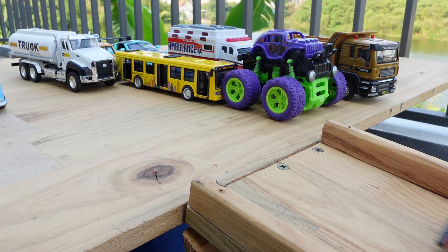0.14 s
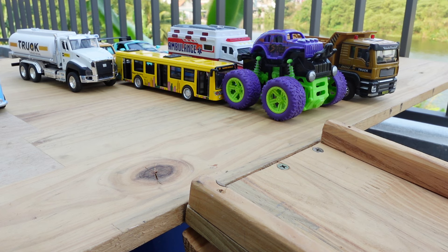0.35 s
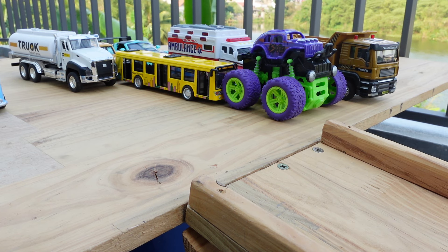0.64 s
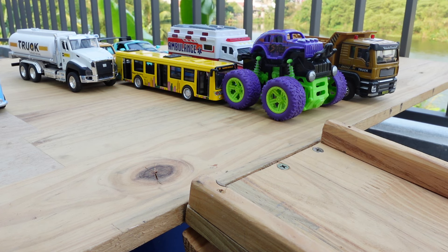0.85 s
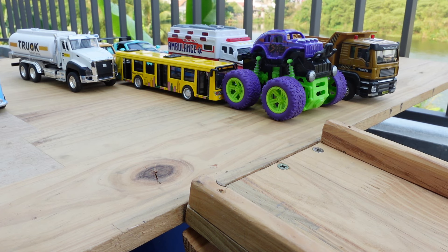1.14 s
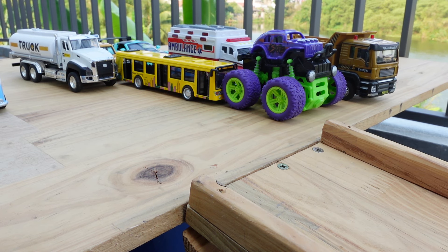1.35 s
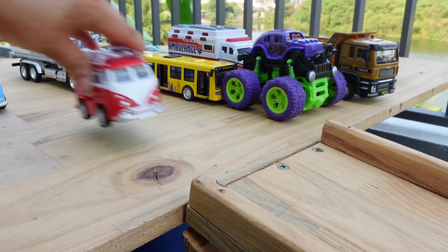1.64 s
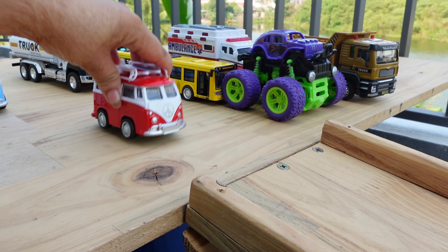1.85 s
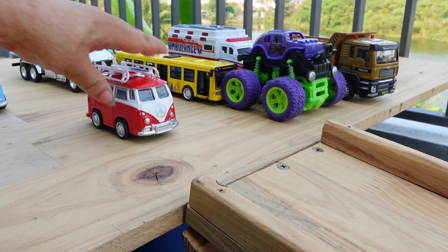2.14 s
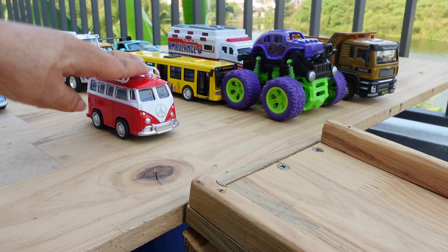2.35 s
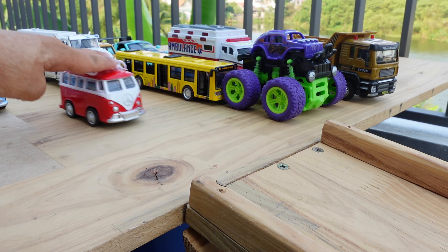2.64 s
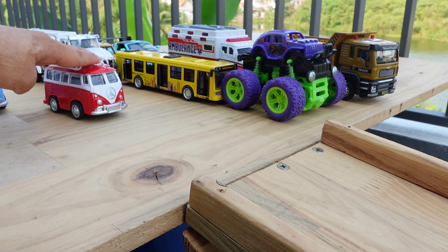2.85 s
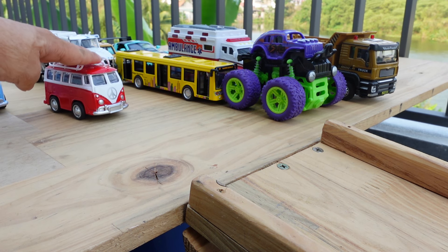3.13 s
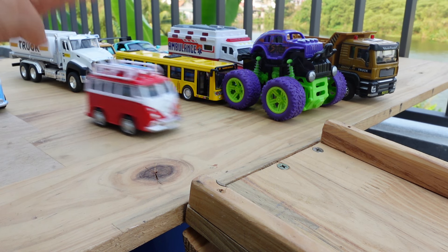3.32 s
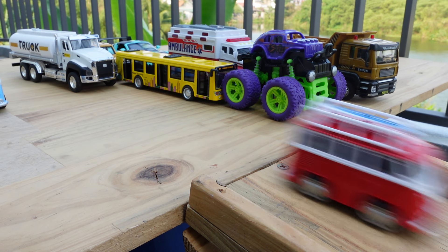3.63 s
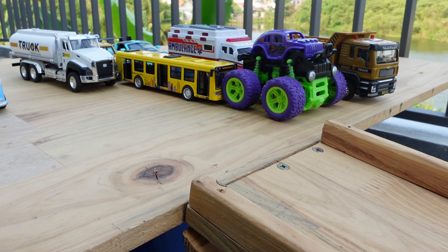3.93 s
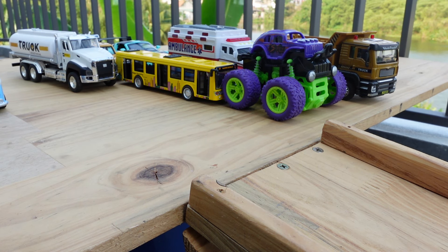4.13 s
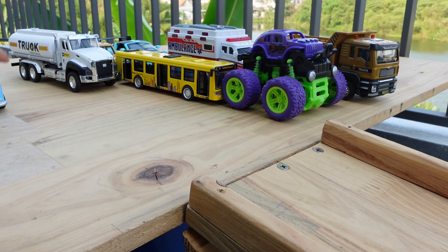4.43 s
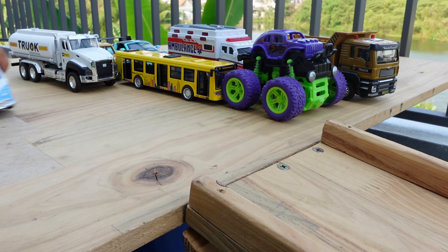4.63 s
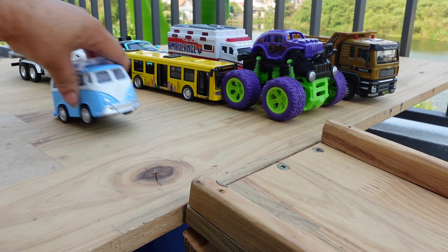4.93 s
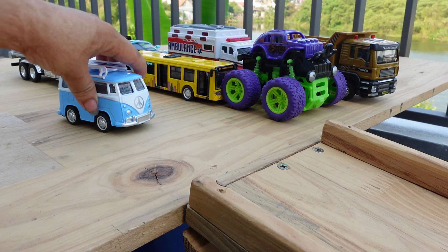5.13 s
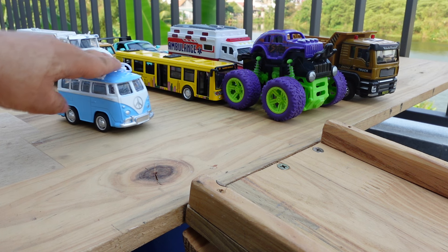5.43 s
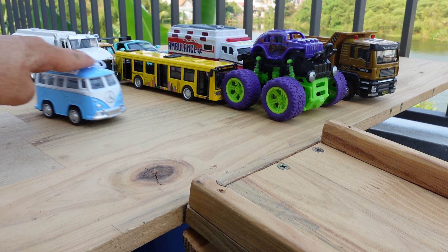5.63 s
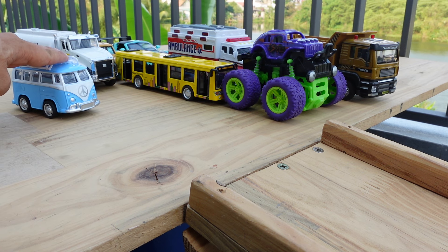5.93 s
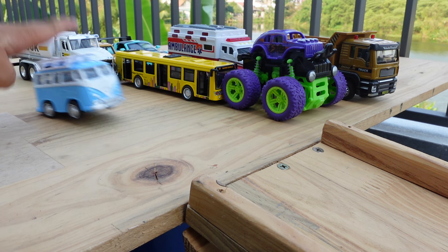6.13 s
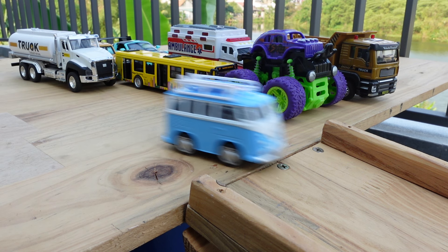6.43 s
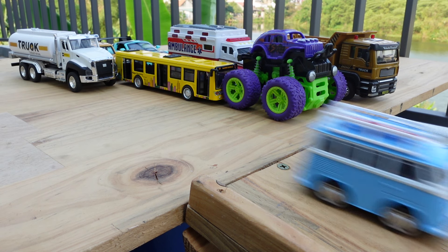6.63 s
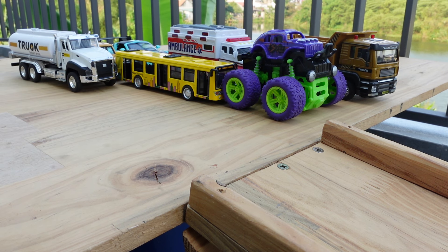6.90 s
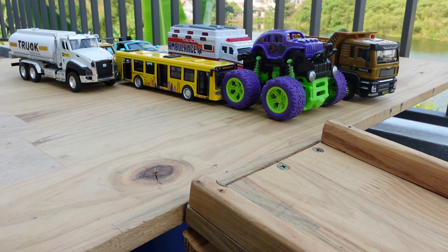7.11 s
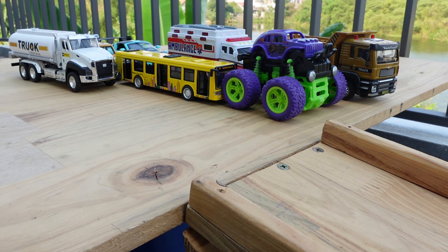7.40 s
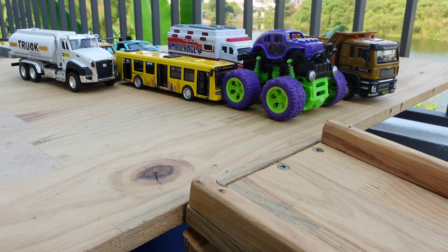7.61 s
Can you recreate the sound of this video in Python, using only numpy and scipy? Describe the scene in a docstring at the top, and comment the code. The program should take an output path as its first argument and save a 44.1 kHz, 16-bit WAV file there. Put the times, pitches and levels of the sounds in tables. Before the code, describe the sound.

Outdoors at a wooden table, a toy truck rumbles away with dull wooden knocks under low wind buffeting. A toy van is set down with a sharp clack, its gears tick as it is pulled back, then it clatters away down a board. After a quieter pause a second van does the same. Close microphone, almost dry, much louder on the left, with a faint distant wash and hum.

```python
"""At a wooden table outdoors, small pull-back toy cars are set down, drawn back to wind their springs and let go.
They rattle over the top and down a plank ramp, knocking as they go. Every contact is a burst of noise and
fading rings of shell, hard parts, board and table. Shaped noise makes wind on the microphone and a distant
wash, with a faint hum; a thin whine comes once. The left channel is much louder than the right."""
import sys
import numpy as np
from scipy import signal
from scipy.fft import rfft, irfft
from scipy.io import wavfile
from scipy.ndimage import uniform_filter1d, minimum_filter1d

SR = 44100
rng = np.random.default_rng(int(sys.argv[2]) if len(sys.argv) > 2 else 0)


def put_to_file(sound):
    """Save the sound as 16-bit audio at rate SR, in the file named by the first command-line argument."""
    columns = np.atleast_2d(sound).T  # one column per channel
    safe = np.clip(columns, -1, 1)
    whole_steps = np.round(safe * 32767)
    wavfile.write(sys.argv[1], SR, whole_steps.astype(np.int16))


N = 342216
TIME = np.arange(N) / SR  # seconds
RING = np.arange(SR // 14) / SR  # seconds within one ring

# Modes are the pitches at which a thing rings by itself.
# Each row of these four: pitch in Hz, relative level in dB, time to fade by 60 dB in seconds.
# A car's shell and chassis.
SHELL_MODES = [(1235, 2, 0.017), (1462, 0, 0.024), (1580, -5, 0.026), (1864, -4.5, 0.016),
               (1945, -5.5, 0.021), (2190, -3, 0.03), (2590, -9.5, 0.058), (2783, 2, 0.018),
               (3150, -16, 0.033), (3640, -6.5, 0.029), (3936, 0, 0.024), (4540, -8.5, 0.032),
               (4980, -16, 0.034), (5230, -34, 0.0083)]
# The small hard parts, axles and gears.
EDGE_MODES = [(5570, 17, 0.038), (6420, 12.5, 0.023), (6880, 14.5, 0.025), (7240, -6, 0.014),
              (8800, -11, 0.044), (9370, -54.5, 0.004), (11500, -60.5, 0.0053), (13300, -12, .01),
              (15000, 1, 0.0093)]
# The ramp board.
BOARD_MODES = [(495, -7.5, 0.024), (577, -1.5, 0.037), (690, -3, 0.028), (813, 1.5, 0.019),
               (910, -4, 0.017), (1043, -1.5, 0.021)]
# The table top.
TABLE_MODES = [(130, -0.5, 0.089), (219, -11.5, 0.034), (256.4, 1.5, 0.11), (312, -3, 0.034),
               (383, -4, 0.073), (469, -8, 0.049)]


def amp(db):
    """Turns decibels into a gain."""
    return 10 ** (np.asarray(db) / 20)


def unit(x):
    """Scales a sound to an rms (average strength) of 1."""
    return x / np.sqrt(np.mean(x ** 2) + 1e-20)


def blow(x):
    """Scales a ring to rms 1 over its first 10 ms."""
    return x / np.sqrt(np.mean(x[:SR // 100] ** 2))


def add(mix, s, sound):
    """Mixes a sound in at s seconds."""
    part = mix[max(round(s * SR), 0):][:len(sound)]
    part += sound[:len(part)]


def noise(points):
    """Complex noise with the given spectrum: its real part is the sound, its size the envelope."""
    hz, db = np.transpose(points)
    bins = np.fft.rfftfreq(N, 1 / SR)
    shape = amp(np.interp(np.log(bins + 1), np.log(hz), db))
    shaped = irfft(rfft(rng.standard_normal(N)) * shape, N)
    return signal.hilbert(unit(shaped))


def drift(rate):
    """A random curve of rms 1 that takes a new direction rate times a second."""
    points = rng.standard_normal(N // 20)
    return unit(np.interp(TIME * rate, np.arange(N // 20), points))


def strike(modes, vary_db, scatter):
    """One blow makes all the modes ring and fade; where it lands changes their strengths each time."""
    hz, db, t60 = np.transpose(modes)
    weight, detune, start = rng.standard_normal((3, len(hz)))
    hz = hz * (1 + scatter * detune)
    fade = amp((db + vary_db * weight)[:, None] - 60 * RING / t60[:, None])
    rings = fade * np.sin(2 * np.pi * hz[:, None] * RING)
    # the vibration takes a moment to fill the body
    ring = np.sign(start) @ rings * (1 - np.exp(-RING / 0.00057))
    return blow(ring)


def crack(lo_hz, hi_hz, decay):
    """The crowded vibration at the moment of contact: band-limited noise dying over decay seconds."""
    burst = rng.standard_normal(len(RING)) * np.exp(-RING / decay) * (1 - np.exp(-RING / 0.0004))
    band = signal.butter(2, [lo_hz, min(hi_hz, SR * 0.45)], "band", fs=SR, output="sos")
    return blow(signal.sosfilt(band, burst))


def contact(centre_hz, range_octaves, shell_share, t60=0.021):
    """One small contact as four parts, shell, hard edge, board and table, with a ring pitch of its own."""
    hz = np.clip(centre_hz * 2 ** (range_octaves * rng.standard_normal()), 1200, 6500)
    own = strike([(hz, 0, t60)], vary_db=0, scatter=0)
    own += 0.55 * crack(lo_hz=hz / 1.62, hi_hz=hz * 1.34, decay=0.0026)
    shell = own + shell_share * strike(SHELL_MODES, vary_db=10.5, scatter=0.0079)
    edge = strike(EDGE_MODES, vary_db=5, scatter=0.03)
    edge += 0.93 * crack(lo_hz=4700, hi_hz=9260, decay=0.0016)
    board = strike(BOARD_MODES, vary_db=3.0, scatter=0.019)
    table = strike(TABLE_MODES, vary_db=7.0, scatter=0.071)
    return np.array([shell, edge, board, table])


def wood_at(s):
    """Board and table answer differently on the table top, on the ramp and at its foot: dB at time s."""
    # The way down of the truck, the red van and the blue van.
    # Each row: tips onto the ramp, reaches its foot, comes to rest, all in seconds.
    descents = [(-0.3, -0.053, 1.22), (3.546, 3.852, 4.24), (6.47, 6.828, 7.16)]
    # How the wood answers a contact on the table top, on the ramp and at its foot.
    # Each row: board level in dB, table thump in dB, both relative.
    wood_levels = [(-15.5, -10), (-18.5, -20), (-5.5, -15)]
    place = sum((s >= ramp) * (s < rest) * (1 + (s >= foot)) for ramp, foot, rest in descents)
    return np.array(wood_levels)[place].T


def motion(curve):
    """Gain over time of one movement, given as (seconds, dB) points, with soft ends."""
    s, db = np.transpose(curve)
    ends = np.clip(np.minimum(TIME - s[0], s[-1] - TIME) / 0.02, 0, 1)
    return ends * amp(np.interp(TIME, s, db))


def rattle(moves, per_s, spread_db, clump_db, parts_db, centre_hz, range_octaves, shell_share, count=60):
    """Many small clumped contacts, each at one of count places; parts_db weights the four parts."""
    # Harder running is brighter and rings the wood less.
    # In order: change in dB per dB of rattle for shell, hard edge, board, table.
    force_tilt = (0, 0.25, -0.34, -0.48)
    size_db = spread_db * np.minimum(rng.exponential(1, N), 2.5)
    size = amp(size_db + clump_db * drift(rate=90))
    clicks = size * (rng.random(N) < per_s / SR) * rng.choice([-1, 1], N)
    # each place shares its energy differently among shell, edge, board and table
    places = []
    for _ in range(count):
        share = amp(2.1 * rng.standard_normal((4, 1)))
        places.append(contact(centre_hz, range_octaves, shell_share) * share)
    place = rng.integers(0, count, N)
    out = np.zeros(N)
    for move in moves:
        s, db = np.transpose(move)
        span = slice(max(int((s[0] - 0.01) * SR), 0), min(int((s[-1] + 0.015) * SR), N))
        t, level = TIME[span], motion(move)[span]
        force = np.interp(t, s, db - db.mean())
        parts = np.zeros((4, len(t) + len(RING)))
        for at in np.flatnonzero(clicks[span]):
            parts[:, at:at + len(RING)] += clicks[span][at] * places[place[span][at]]
        answers = [0, 0, *wood_at(t)]
        for sound, wood_db, part_db, tilt in zip(parts[:, :len(t)], answers, parts_db, force_tilt):
            # the motion sets the mean power; single contacts stay uneven
            power = abs(uniform_filter1d(sound ** 2, size=2200))
            even = sound / np.sqrt(power + 1e-6)
            out[span] += even * level * amp(wood_db + part_db + tilt * force)
    return out


def rolling():
    """Cars run free and the wood rumbles; the heavier truck has a denser, duller roll than the two vans."""
    # How hard each free-running car rattles. Each row: time in seconds, relative level in dB.
    truck_run = [(0.0, -35.5), (0.14, -50), (0.23, -39.5), (0.36, -36), (0.5, -41.5), (0.78, -35.5),
                 (0.84, -29.5), (0.96, -32), (1.04, -41.5), (1.19, -43)]
    # The red van. Each row: time in seconds, relative level in dB.
    red_run = [(3.315, -15.5), (3.39, -26), (3.46, -35), (3.6, -25.5), (3.7, -30), (3.81, -35),
               (3.88, -23.5), (4.05, -40), (4.22, -48)]
    # The blue van. Each row: time in seconds, relative level in dB.
    blue_run = [(6.219, -19.5), (6.41, -30), (6.51, -25), (6.61, -31), (6.72, -22.5), (6.79, -35),
                (6.86, -21.5), (6.94, -26), (7.02, -38.5), (7.14, -42)]
    # Rumble of the wood under rolling wheels. Each row: pitch in Hz, relative level in dB per Hz.
    rumble_spectrum = [(18, -22), (40, -9.5), (85, 4), (125, -4.5), (180, -11), (260, -16), (500, -29),
                       (2000, -60)]
    rumble_db = -9  # against the rattle
    truck_weight_db = 14.5  # the truck rumbles this much more, against its rattle, than a van
    truck = rattle([truck_run], per_s=1500, spread_db=3, clump_db=5.0, parts_db=(0, -16, 5.5, 10),
                   centre_hz=1803, range_octaves=0.48, shell_share=0.2)
    red = rattle([red_run], per_s=420, spread_db=4.5, clump_db=3.5, parts_db=(-1.5, -17, 1.5, 5.5),
                 centre_hz=2500, range_octaves=0.564, shell_share=0.84, count=40)
    blue = rattle([blue_run], per_s=450, spread_db=4, clump_db=3.0, parts_db=(-1, -17, -3.5, -2.5),
                  centre_hz=2746, range_octaves=0.528, shell_share=1.0, count=40)
    weight = amp(truck_weight_db) * motion(truck_run) + motion(red_run) + motion(blue_run)
    rumble = amp(rumble_db) * weight * noise(rumble_spectrum).real
    return truck + red + blue + rumble


def wind(steadiness, lull_db):
    """Eddies shed at the microphone: deep, fairly even buffeting and a lighter, fitful flutter."""
    # Strength of the wind on the microphone. Each row: time in seconds, relative level in dB.
    breeze = [(0.0, -17), (0.12, -9.5), (1.2, -12.5), (1.54, -25.5), (1.85, -18.5), (2.14, -25),
              (2.21, -15), (2.8, -26), (2.93, -13), (3.22, -12.5), (3.78, -32.5), (4.1, -31.5), (4.4, -51),
              (5.8, -47.5), (6.33, -31.5), (6.6, -48), (7.05, -38.5), (7.35, -57), (7.7, -38.5)]
    # Spectrum of the buffeting. Each row: pitch in Hz, relative level in dB per Hz.
    buffet_spectrum = [(8, -11), (18, -6), (30, -2), (48, -1.5), (70, -6.5), (100, -33), (200, -68),
                       (500, -85.5)]
    # Spectrum of the flutter. Each row: pitch in Hz, relative level in dB per Hz.
    flutter_spectrum = [(40, -9), (80, 5), (120, -3), (170, -8.5), (250, -18.5), (400, -25.5), (800, -32.5),
                        (2000, -43.5), (8000, -56.5)]
    flutter_db, flutter_slope = -15, 0.66  # the flutter follows the wind by this many dB per dB
    strength = np.interp(TIME, *np.transpose(breeze))
    raw = noise(buffet_spectrum)
    # dividing by part of the envelope evens out the buffeting
    steady = unit(raw.real / (abs(raw) ** 2 + 0.6) ** (steadiness / 2))
    eddies = steady * amp(strength + 1.2 * drift(rate=9))
    flutter_level = flutter_db + flutter_slope * strength + lull_db * drift(rate=14)
    ripples = noise(flutter_spectrum).real * amp(flutter_level)
    # each has its own left and right gains in dB
    return eddies * amp([[4.8], [-11.8]]) + ripples * amp([[5], [-14]])


def outdoors():
    """A distant wash of shaped noise with the wavering hum of some far machine, a sine of drifting pitch."""
    # Spectrum of the wash. Each row: pitch in Hz, relative level in dB per Hz.
    wash_spectrum = [(24, -49), (40, -24), (104, -11), (118, -1), (140, -11), (204, -12.5), (354, -15),
                     (392, -18), (455, -18), (503, -17), (715, -22.5), (790, -20.5), (918, -27),
                     (4930, -38), (16000, -53.5)]
    wash_db, hum_db = -39, -46  # before the channel gains
    hum_hz = 139.3  # middle of its wavering pitch
    turns = np.cumsum(hum_hz * (1 + 0.01977 * drift(rate=9))) / SR
    hum = unit(np.sin(2 * np.pi * turns) * amp(3 * drift(rate=8)))
    wash = noise(wash_spectrum).real * amp(1.04 * drift(rate=4.5))
    return amp(wash_db) * wash + amp(hum_db) * hum


def knock(hz, edge, board, thump):
    """A wheel or body hits the wood: shell cracks and rings, board and table answer, one mode stands out."""
    shell_db = 0.38
    shell = amp(-8) * strike(SHELL_MODES, vary_db=5.5, scatter=0.0063)
    shell += amp(-6.0) * crack(lo_hz=1460, hi_hz=4720, decay=0.0048)
    main = amp(-5) * strike([(hz, 0, 0.022)], vary_db=0, scatter=0)
    main += amp(-4.5) * crack(lo_hz=hz / 1.255, hi_hz=hz * 1.195, decay=0.0033)
    tick = amp(-7) * strike(EDGE_MODES, vary_db=5, scatter=0.012)
    tick += amp(-3) * crack(lo_hz=4670, hi_hz=9700, decay=0.0024)
    # the very first instant of a hard contact is the brightest
    tick += amp(-14.5) * crack(lo_hz=11500, hi_hz=16600, decay=0.0017)
    plank = strike(BOARD_MODES, vary_db=2.5, scatter=0.0083)
    if hz > EDGE_MODES[1][0]:
        tick += main  # so high a mode belongs to the small hard parts
    elif hz < BOARD_MODES[-1][0]:
        # so low a mode belongs to the board: a flat landing drives it and spares the shell
        plank = blow(plank + 2 * main)
        shell_db, board = -10.5, 0.5
    else:
        shell += main
    table = strike(TABLE_MODES, vary_db=3.5, scatter=0.03)
    return amp(shell_db) * blow(shell) + amp(edge) * tick + amp(board) * plank + amp(thump) * table


def knocks(graze_db=-19, graze_s=0.0027):
    """Each knock is a graze of one wheel, the weight landing, and a weaker rebound onto the other axle."""
    # The knocks that stand out. Each row: start in seconds, relative level in dB,
    # pitch that stands out in Hz, relative level of the hard edge in dB.
    knock_list = [(0.3712, -40, 1780, -30), (0.423, -39, 2040, -29), (0.476, -36, 1920, -30),
                  (0.554, -41, 1880, -6.5), (0.6806, -23.5, 2140, -30), (0.7069, -28, 600, -30),
                  (0.7644, -31, 1660, -3), (0.819, -27.5, 2800, -1.5), (0.833, -27, 1610, -25),
                  (0.8996, -28, 830, -5.5), (0.948, -33.5, 2400, -2), (1.0733, -34.5, 3060, -6),
                  (1.0932, -29.5, 1790, -34), (1.1002, -24, 870, -32), (1.3112, -30, 4355, -5.5),
                  (1.3743, -28.5, 2960, -14), (1.9196, -16.5, 2385, -6.5), (1.9273, -23, 1370, -16),
                  (1.945, -24, 3480, -33), (1.9786, -28, 3550, -31), (2.7536, -26.5, 5300, -4.5),
                  (2.8182, -40, 2500, -28), (2.92, -34, 4740, -0.5), (3.27, -27.5, 3880, -3.5),
                  (3.3167, -15.5, 4040, -7.5), (3.3577, -21.5, 4020, -16), (3.4129, -21, 3710, -26),
                  (3.4966, -21, 2640, -16), (3.571, -14.5, 5260, -20), (3.602, -23.5, 2190, -20),
                  (3.665, -20.5, 1310, -21), (3.689, -19.5, 1870, -25), (3.7172, -17.5, 1950, -26),
                  (3.7336, -25, 1820, -28), (3.8458, -23, 2690, -32), (3.859, -20, 564, -32),
                  (3.868, -19.5, 3680, -30), (3.8856, -22, 2240, -31), (3.9154, -26.5, 1340, -30),
                  (3.99, -17, 2545, -4.5), (4.006, -23, 1720, -14), (4.0354, -26.5, 2260, -29),
                  (4.089, -36.5, 8600, 3), (4.1095, -19.5, 1360, -28), (4.1233, -28.5, 2200, -29),
                  (4.171, -31, 810, -25), (4.177, -20.5, 2060, -13), (4.3241, -39, 6300, -16),
                  (4.346, -37.5, 1240, -19), (4.55, -36, 1430, -30), (4.6701, -36, 1360, -34),
                  (4.7159, -37.5, 2860, -24), (4.9503, -34, 1340, -33), (4.9683, -31.5, 2900, -30),
                  (5.1166, -20.5, 2680, -9), (5.2492, -33, 1390, -30), (5.4827, -54, 4520, 6.5),
                  (5.887, -38.5, 3500, -14), (5.9133, -38, 2370, -8), (6.0436, -33.5, 2850, -9),
                  (6.117, -25.5, 5040, -5.5), (6.225, -17.5, 5000, -8.5), (6.265, -17, 2390, -3.5),
                  (6.2831, -22, 5070, -18), (6.3049, -19, 3690, -11), (6.3201, -20, 3760, -10),
                  (6.3376, -18.5, 3450, -10), (6.3667, -23.5, 2950, -24), (6.3846, -22.5, 2980, -29),
                  (6.443, -21.5, 3790, -10), (6.555, -18.5, 1860, -12), (6.6565, -18, 1660, -9.5),
                  (6.724, -24.5, 4150, -11), (6.831, -23.5, 2750, -28), (6.8409, -27, 810, -25),
                  (6.8613, -24.5, 2300, -12), (6.9729, -17.5, 3740, -2.5), (6.9901, -20, 2060, -27),
                  (7.0525, -18.5, 1491, -12), (7.0723, -22, 1360, -14), (7.0954, -27.5, 1440, -25),
                  (7.109, -25.5, 2320, -10.5), (7.6588, -30.5, 2000, -37)]
    # the rebound's usual delay in seconds, its level and the random spread of that level in dB
    rebound_s, rebound_db, rebound_spread_db = 0.0072, -13.5, 4
    # a light touch loses less thump than ring: dB regained per dB under a firm knock
    firm_db, soft_thump = -14.5, 0.24
    out = np.zeros(N)
    for s, db, hz, edge in knock_list:
        board, thump = wood_at(s)
        thump += soft_thump * (firm_db - db)
        early, late, strength = rng.standard_normal(3)
        light = knock(hz, edge, board, thump)
        add(out, s - graze_s * np.exp(0.3 * early), amp(db + graze_db) * light)
        add(out, s, amp(db) * knock(hz, edge, board, thump))
        back_db = db + rebound_db + rebound_spread_db * strength
        add(out, s + rebound_s * np.exp(0.15 * late), amp(back_db) * light)
    return out


def thuds():
    """The table top booms briefly under a soft weight, ringing in its own modes."""
    # Soft, heavy touches that only sound the table top. Each row: start in seconds, relative level in dB.
    thud_list = [(0.476, -26), (3.3667, -26), (4.09, -23), (4.968, -30.5), (5.117, -28), (5.8868, -29),
                 (6.0436, -30.5), (7.0722, -29)]
    out = np.zeros(N)
    for s, db in thud_list:
        add(out, s, amp(db) * strike(TABLE_MODES, vary_db=2, scatter=0.027))
    return out


def handling():
    """Fingers slide on a car's shell: fine, even friction that fades as the grip settles."""
    # Each row: start in seconds, end in seconds, relative level at the start in dB.
    slides = [(1.45, 1.847, -45.5), (2.122, 2.558, -42.5), (4.653, 4.746, -40), (7.672, 7.79, -40.5)]
    fade_db = 5
    moves = [[(start, db), (end, db - fade_db)] for start, end, db in slides]
    return rattle(moves, per_s=1500, spread_db=-0.5, clump_db=3.5, parts_db=(-1.1, -12.5, 11, 7.5),
                  centre_hz=1933, range_octaves=0.6, shell_share=0.75)


def whine(waver=0.0046):
    """A faint, thin tone of a few sines that waver together, swelling and fading once."""
    # When it sounds. In order: start in seconds, end in seconds.
    whine_span = (2.11, 2.7)
    # Its sines. Each row: pitch in Hz, relative level in dB.
    partials = [(851, -50.5), (1437, -51.5), (1895, -61)]
    start, end = whine_span
    swell = np.sin(np.pi * np.clip((TIME - start) / (end - start), 0, 1))
    turns = np.cumsum(1 + waver * drift(rate=60)) / SR
    tone = sum(np.sqrt(2) * amp(db) * np.sin(2 * np.pi * hz * turns) for hz, db in partials)
    return swell * tone


def winding():
    """Gears tick as a van is drawn back, louder as its spring tightens."""
    # A van drawn back under a finger. Each row: start in seconds, end in seconds,
    # relative level at the end in dB, middle pitch of its gears in Hz.
    windings = [(2.525, 2.871, -35.5, 3420), (3.148, 3.294, -34, 3420), (5.55, 5.909, -39, 2080),
                (6.023, 6.148, -31.5, 2400)]
    growth_db = 7
    out = np.zeros(N)
    for start, end, db, hz in windings:
        move = [(start, db - growth_db), (end, db)]
        out += rattle([move], per_s=450, spread_db=3.0, clump_db=2.5, parts_db=(1, -14, 12, 10.5),
                      centre_hz=hz, range_octaves=0.56, shell_share=0.98, count=30)
    return out


def terrace(x, wet_db=-15, low_t60=0.16, high_t60=0.18):
    """Weak, short reflections from the railing and walls nearby: random echoes that quickly fade."""
    t = np.arange(SR // 2) / SR
    taps = rng.standard_normal(len(t)) * (rng.random(len(t)) < 0.08) * (t > 0.005)
    low = signal.sosfilt(signal.butter(2, 4000, fs=SR, output="sos"), taps)
    tail = low * amp(-60 * t / low_t60) + 0.75 * taps * amp(-60 * t / high_t60)
    return x + amp(wet_db) * signal.oaconvolve(x, tail / np.linalg.norm(tail))[:N]


def scene():
    """Cars, air and wind reach the two unequal channels, over a faint hiss."""
    cars = rolling() + knocks() + thuds() + handling() + winding()
    sound = terrace(cars) + outdoors() + whine()
    hiss = amp(-72) * rng.standard_normal((2, N))
    # left and right gains in dB
    return sound * amp([[5.1], [-14.5]]) + wind(steadiness=0.26, lull_db=2.5) + hiss


def record(dry, ceiling=1.0):
    """A fast limiter holds each channel to full scale; then a low-pass takes off the top above 16 kHz."""
    room = np.minimum(1, ceiling / (abs(dry) + 1e-9))
    gain = uniform_filter1d(minimum_filter1d(room, size=89, axis=1), size=89, axis=1)
    lowpass = signal.firwin(401, 16000, window=("kaiser", 8), fs=SR)
    return signal.oaconvolve(dry * gain, lowpass[None], "same", axes=1)


dry = scene()
out = record(dry)
put_to_file(out)
```